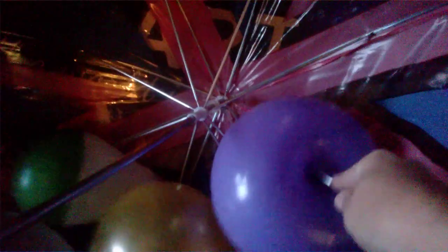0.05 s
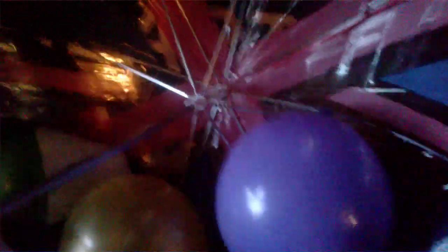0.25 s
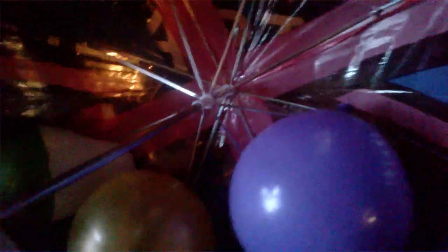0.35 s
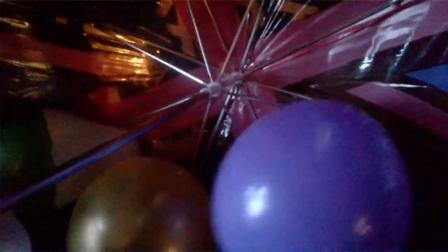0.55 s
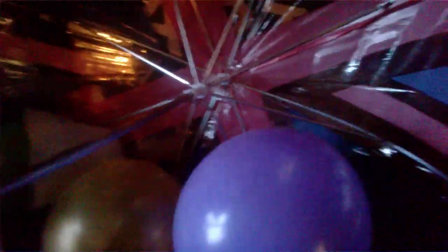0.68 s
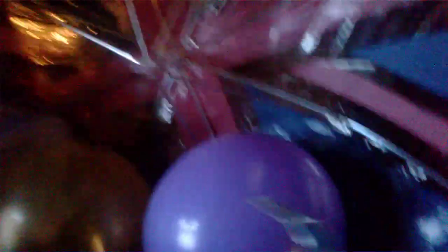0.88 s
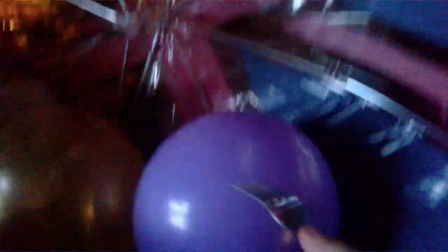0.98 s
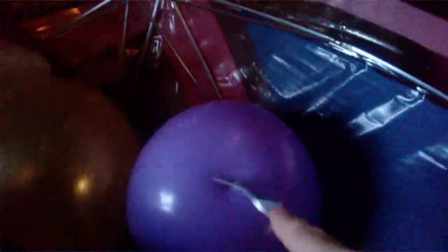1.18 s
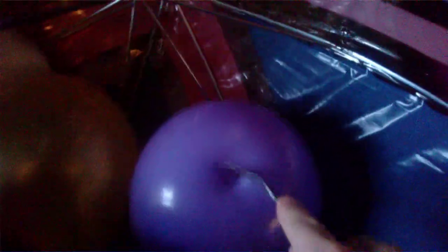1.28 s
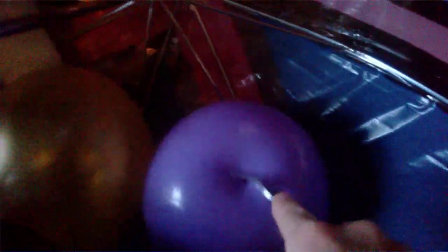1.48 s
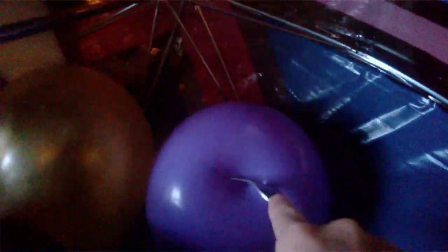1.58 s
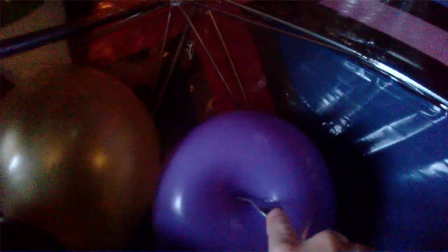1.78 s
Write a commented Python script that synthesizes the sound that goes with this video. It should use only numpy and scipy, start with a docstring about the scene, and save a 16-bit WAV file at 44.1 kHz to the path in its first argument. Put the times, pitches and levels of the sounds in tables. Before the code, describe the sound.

A taut balloon gives a hollow thump as a pressing fork slips off, then a sharper, lighter knock. Soft bumps, faint rubbing and tiny squeaks follow as the fork pushes in again, close by in a small quiet room.

```python
"""Fork pressed into a balloon

In a small quiet room, taut rubber creeps under a fork by stick-slip friction, then slips free with
a hollow thump, and the balloon knocks against its surroundings, ringing in its membrane modes.
The fork is set on it again and pushed in slowly, with soft bumps, rubbing and tiny squeaks.
Plastic foil nearby ticks twice as a crease flips."""
import sys
import numpy as np
from scipy import signal
from scipy.fft import rfft, irfft
from scipy.io import wavfile
from scipy.ndimage import uniform_filter1d

SR = 44100
rng = np.random.default_rng(int(sys.argv[2]) if len(sys.argv) > 2 else 0)


def bounce(signal):
    """Save signal as a 16-bit WAV file at the path given by the first command-line argument."""
    frames = np.transpose(np.atleast_2d(signal))
    limited = np.clip(frames, -1, 1)
    pcm = np.round(limited * 32767).astype(np.int16)
    wavfile.write(sys.argv[1], SR, pcm)


N = 81585


def amp(db):
    """Amplitude ratio of a level in decibels."""
    return 10 ** (np.asarray(db) / 20)


def unit_rms(x):
    """Normalisation to an rms of 1."""
    return x / np.sqrt(np.mean(x ** 2) + 1e-20)


def curve_at(points, hz):
    """Interpolation on a logarithmic frequency axis."""
    frequency_hz, value = np.transpose(points)
    return np.interp(np.log(hz + 1), np.log(frequency_hz), value)


def add(mix, start_s, sound):
    """Superposition: a sound joins the mix at its start time."""
    part = mix[max(round(start_s * SR), 0):][:len(sound)]
    part += sound[:len(part)]


def seconds():
    """Half-second time axis for a transient."""
    return np.arange(SR // 2) / SR


def coloured(x, spectrum):
    """Spectral shaping by a curve of relative gains, at an rms of 1."""
    gain = amp(curve_at(spectrum, np.fft.rfftfreq(len(x), 1 / SR)))
    return unit_rms(irfft(rfft(x) * gain, len(x)))


def whitened(x):
    """Whitening evens out the broad spectral peaks and dips of a transient; its second half is muted."""
    spectrum = rfft(x)
    smoothed = np.sqrt(abs(uniform_filter1d(abs(spectrum) ** 2, size=80)) + 1e-20)
    return irfft(spectrum / smoothed, len(x)) * (np.arange(len(x)) < len(x) / 2)


def burst(envelope, spectrum):
    """A noise transient with a given decay and spectrum, at unit energy."""
    noise = coloured(whitened(envelope * rng.standard_normal(len(envelope))), spectrum)
    noise = noise * (np.arange(len(noise)) < len(noise) / 2)
    return noise / np.linalg.norm(noise)


def damped_sine(level_db, pitch_hz, t60_s):
    """Free vibration of a damped oscillator, falling 60 dB in t60_s."""
    t = seconds()
    return amp(level_db - 60 * t / t60_s) * np.sin(2 * np.pi * pitch_hz * t)


def modes(table, pitch_ratio):
    """Modal superposition: damped sines, with neighbouring modes in opposite phase."""
    return sum((-1) ** k * damped_sine(level_db, base_hz * pitch_ratio, t60_s)
               for k, (base_hz, level_db, t60_s) in enumerate(table))


def air():
    """Stationary coloured noise forms the faint background of the room."""
    # background spectrum: frequency_hz, gain_db
    spectrum = [(15, 11.5), (25, -6), (75, 2), (240, -5.5), (322, 3.5), (567, -4.5), (648, -1), (997, -17),
                (1300, -14), (2420, -18.5), (5430, -19.5), (7500, -26.5), (15500, -24.5)]
    return amp(-65.5) * coloured(rng.standard_normal(N), spectrum)


def slips(spectrum, rate_per_s=4000, spread_db=3):
    """Stick-slip friction: a dense random train of impulses of uneven size."""
    sizes = amp(spread_db * np.minimum(rng.exponential(1, N), 4)) * rng.choice([-1, 1], N)
    slipping = rng.random(N) < rate_per_s / SR
    return coloured(sizes * slipping, spectrum)


def rubbing():
    """Stick-slip friction shakes the skin for as long as a stroke lasts."""
    # one envelope for each stroke, as points: time_s, relative_db
    strokes = [
        [(0.0, -64.5), (0.046, -63.5), (0.066, -79), (0.102, -64), (0.152, -61), (0.19, -50.5), (0.218, -49),
         (0.248, -33)],
        [(0.285, -40.5), (0.303, -48.5), (0.361, -51), (0.371, -66.5), (0.425, -67.5)],
        [(0.5, -70), (0.518, -63), (0.53, -58.5), (0.553, -60.5), (.565, -47.5)],
        [(0.62, -56.5), (0.676, -76), (0.738, -64), (0.816, -86), (0.86, -70.5), (0.956, -86)],
        [(1.1, -64), (1.108, -80), (1.196, -67), (1.276, -75), (1.286, -67), (1.378, -75), (1.39, -69.5),
         (1.43, -65), (1.85, -75)],
    ]
    # spectrum of rubbed rubber: frequency_hz, gain_db
    spectrum = [(40, -22.5), (100, 6.5), (220, 4), (600, -1), (850, -10.5), (1250, -10.5), (1700, -21.5),
                (2200, -30), (4000, -43), (8000, -56.5), (16000, -56)]
    gain_db, fade_db_per_s = 5, 904.5
    t, envelope = np.arange(N) / SR, np.zeros(N)
    for stroke in strokes:
        time_s, relative_db = np.transpose(stroke)
        outside_s = np.maximum(np.maximum(time_s[0] - t, t - time_s[-1]), 0)
        stroke_db = np.interp(t, time_s, relative_db) - fade_db_per_s * outside_s
        envelope = np.maximum(envelope, amp(stroke_db))
    return amp(gain_db) * envelope * slips(spectrum)


def foil(rise_s=0.00025):
    """Buckling: a crease in the foil flips with a tick of a few cycles."""
    # crease ticks: start_s, level_db, pitch_hz
    ticks = [(.102, -45, 1500), (1.667, -45.5, 2700)]
    out, attack = np.zeros(N), np.minimum(seconds() / rise_s, 1)
    for start_s, level_db, pitch_hz in ticks:
        add(out, start_s, attack * damped_sine(level_db, pitch_hz, t60_s=0.0038))
    return out


def push(contact_s):
    """Elastic contact gives a rounded force pulse: the shorter, the brighter."""
    return np.sin(np.pi * np.minimum(seconds() / contact_s, 1)) ** 2


def snap(corner_hz, decay_s=0.00081):
    """Sudden release: rubber slips off the tines with a crack, dull above its corner frequency."""
    # spectrum of the crack ahead of the low-pass: frequency_hz, gain_db
    spectrum = [(300, -12.5), (1500, 26), (2250, 9), (2900, 9.5), (4600, 2.5), (6000, -11), (9000, -11),
                (15000, -0.5)]
    crack = burst(np.exp(-seconds() / decay_s), spectrum)
    return signal.lfilter(*signal.butter(1, corner_hz, fs=SR), crack)


def ring(force, pitch_ratio):
    """Membrane resonance: a force excites the skin's modes; the distinct ones rise with tension."""
    # distinct modes of the balloon: base_hz, relative_db, t60_s
    skin_modes = [(190.3, 3, 0.065), (348.4, 5, 0.086), (434, -5, .09), (523, -3.5, 0.083),
                  (579, -6.5, 0.054), (657, -7.5, 0.15), (750, -5, 0.074), (879, -3, .075),
                  (1151, 3, 0.038), (1286, 0, 0.059), (1390, 0, 0.023), (1588, -17, 0.05),
                  (1874, -17, 0.034)]
    # wash of weaker modes crowded between and above them: frequency_hz, gain_db
    wash_spectrum = [(150, -3), (600, 17.5), (1300, -6), (1900, -8.5), (2300, -12), (2900, -9), (4000, -25),
                     (6000, 3), (15000, -25)]
    wash_db, wash_t60_s = -3, 0.13
    wash = burst(amp(-60 * seconds() / wash_t60_s), wash_spectrum)
    response = unit_rms(modes(skin_modes, pitch_ratio)) + amp(wash_db) * unit_rms(wash)
    return signal.fftconvolve(force, response / np.linalg.norm(response))[:len(force)]


def radiated(force, ring_db, pitch_ratio, bass_cut_hz=72):
    """Radiation: a force is heard directly, without its deep bass, and through the balloon's modes."""
    direct = signal.lfilter(*signal.butter(1, bass_cut_hz, "high", fs=SR), force)
    return direct + amp(ring_db) * ring(force, pitch_ratio)


def room(x, gain_db=-5, delay_s=0.003, reflections_per_s=4000):
    """Reverberation of a small room: early echoes and a dense tail whose decay depends on frequency."""
    # reverberation times: frequency_hz, t60_s
    decay_times = [(100, 0.14), (500, 0.098), (1500, 0.086), (4000, 0.071), (12000, 0.2)]
    # first reflections from nearby surfaces: delay_s, relative_db
    echoes = [(.007, -19), (0.0232, -24)]
    t = seconds()
    reflections = rng.choice([-1., 1.], len(t)) * (rng.random(len(t)) < reflections_per_s / SR)
    hz, frame_s, bands = signal.stft(reflections * (t > delay_s), SR, nperseg=256)
    decay = amp(-60 * frame_s / curve_at(decay_times, hz)[:, None])
    response = whitened(signal.istft(bands * decay, SR)[1])
    response = response / np.linalg.norm(response)
    for echo_s, relative_db in echoes:
        add(response, echo_s, amp([relative_db]))
    return amp(gain_db) * signal.fftconvolve(x, response)[:N]


def blows():
    """Impulsive excitation: hard slips and knocks set the balloon and the room ringing."""
    # blows on the skin: start_s, level_db, contact_s, ring_db, snap_db, corner_hz, pitch_ratio
    impacts = [(.2275, -33.5, 0.00085, -5, -31, 1525, 1.04), (.2375, -30, 0.00079, 3.5, -21, 2020, 1.03),
               (0.2446, -24, 0.0025, -7.5, -21, 2500, 1.2), (0.2514, -11.5, 0.00074, -12, 2.5, 2300, 1.04),
               (0.555, -35, 0.0015, -7.5, -5, 3000, 1.012), (.569, -37, .0008, -10, 0, 4000, 1),
               (0.574, -25.5, 0.00053, 5.5, 4, 4900, 0.99)]
    out = np.zeros(N)
    for start_s, level_db, contact_s, ring_db, snap_db, corner_hz, pitch_ratio in impacts:
        force = push(contact_s) + amp(snap_db) * snap(corner_hz)
        add(out, start_s, amp(level_db) * radiated(force, ring_db, pitch_ratio))
    return out + room(out)


def thumps(rise_s=0.0028):
    """Heavily damped oscillation of the whole balloon gives low thumps."""
    # wobbles of the balloon: start_s, level_db, pitch_hz, t60_s
    wobbles = [(0.2476, -9, 203.7, 0.051), (.2526, -25, 130, 0.17), (0.255, -29, 51.5, 0.26),
               (0.2684, -11.5, 131, 0.031), (0.307, -28.5, 205, 0.073), (.367, -31, 112, 0.089),
               (0.4548, -34, 313, 0.047), (.871, -36.5, 120, 0.025), (.891, -48.5, 189, 0.043),
               (1.073, -49, 116, 0.096), (1.109, -49, 162, 0.082), (1.217, -45.5, 174, 0.05),
               (1.253, -44.5, 106.5, 0.045), (1.392, -45.5, 151, .088), (1.699, -40, 138, 0.014)]
    out, attack = np.zeros(N), np.minimum(seconds() / rise_s, 1)
    for start_s, level_db, pitch_hz, t60_s in wobbles:
        add(out, start_s, attack * damped_sine(level_db, pitch_hz, t60_s))
    return out


def rasp(start_s=0.251, rise_s=0.0012, level_db=-38, t60_s=0.095):
    """Elastic recoil: the dent springs out and drags rubber along the tines in bright, fading slips."""
    # spectrum of the rasp: frequency_hz, gain_db
    spectrum = [(1000, 3.5), (2350, -11.5), (2850, 2), (3120, -6), (3400, -24.5), (6500, -39)]
    t = np.maximum(np.arange(N) / SR - start_s, 0)
    return np.minimum(t / rise_s, 1) * amp(level_db - 60 * t / t60_s) * slips(spectrum)


def touches():
    """Forced response: taps and soft bumps sound as force pulses with hardly any ringing."""
    # light contacts with the balloon: start_s, level_db, contact_s
    contacts = [(0.3714, -33.5, 0.0023), (.387, -29.5, 0.00377), (0.4007, -32.5, 0.0047),
                (.4336, -27.5, .00094), (.4552, -22.5, .0009), (.535, -43.5, 0.0019),
                (0.8752, -41.5, 0.003), (1.199, -37.5, 0.0015), (1.392, -41, 0.00084), (1.508, -44, .0016),
                (1.698, -46.5, .0018)]
    force = np.zeros(N)
    for start_s, level_db, contact_s in contacts:
        add(force, start_s, amp(level_db) * push(contact_s))
    out = radiated(force, ring_db=-35, pitch_ratio=1)
    return out + room(out)


def tines():
    """The fork's modes, damped by the hand, give dry metallic ticks as the tines catch."""
    # catches of the tines: start_s, level_db
    catches = [(0.5563, -62), (.5692, -56), (0.5738, -45.5), (.584, -56)]
    # modes of the fork: base_hz, relative_db, t60_s
    fork_modes = [(4480, -1, 0.0077), (6100, -12, 0.016), (7000, -12.5, .014)]
    out = np.zeros(N)
    for start_s, level_db in catches:
        add(out, start_s, amp(level_db) * modes(fork_modes, pitch_ratio=0.97))
    return out


def scuffs():
    """Sliding friction of the tines on the rubber gives soft swells of noise."""
    # slides: start_s, length_s, level_db
    slides = [(1.091, 0.16, -62.5), (1.682, 0.14, -66)]
    # spectrum of the friction noise: frequency_hz, gain_db
    spectrum = [(300, -3.5), (900, -3), (1400, -8), (1700, -14.5), (2300, -26), (8000, -44)]
    out, hiss = np.zeros(N), coloured(rng.standard_normal(N), spectrum)
    for start_s, length_s, level_db in slides:
        progress = np.clip((np.arange(N) / SR - start_s) / length_s, 0, 1)
        out += amp(level_db) * np.sin(np.pi * progress) * hiss
    return out


def squeaks(sag_per_s=1.3, jitter_depth=0.035):
    """Periodic stick-slip: for a moment the slips fall into step and make a sagging, unsteady tone."""
    # squeaks of rubber on metal: start_s, length_s, centre_hz, level_db
    tones = [(1.117, 0.029, 1350, -66), (1.152, 0.052, 1054, -59.5), (1.222, 0.038, 1060, -63),
             (1.282, 0.034, 1010, -65.5), (1.387, 0.041, 1060, -59), (1.401, 0.031, 734, -57.5)]
    out = np.zeros(N)
    jitter = jitter_depth * unit_rms(uniform_filter1d(rng.standard_normal(N), size=100))
    for start_s, length_s, centre_hz, level_db in tones:
        t = np.arange(0, length_s, 1 / SR)
        sag = sag_per_s * (t - length_s / 2)
        pitch_hz = centre_hz * (1 - sag + jitter[round(start_s * SR):][:len(t)])
        envelope = amp(level_db) * np.sin(np.pi * t / length_s)
        add(out, start_s, envelope * np.sin(2 * np.pi * np.cumsum(pitch_hz) / SR))
    return out


def scene():
    """Superposition of balloon, fork, foil and background in one channel."""
    return (air() + rubbing() + blows() + rasp() + tines() + touches() + thumps()
            + scuffs() + squeaks() + foil())[None]


def record(dry):
    """Band limiting: a linear-phase low-pass removes the highest treble."""
    cutoff_hz = 15700
    low_pass = signal.firwin(801, cutoff_hz, window=("kaiser", 8), fs=SR)
    return signal.oaconvolve(dry, low_pass[None], "same")


dry = scene()
out = record(dry)
bounce(out)
```